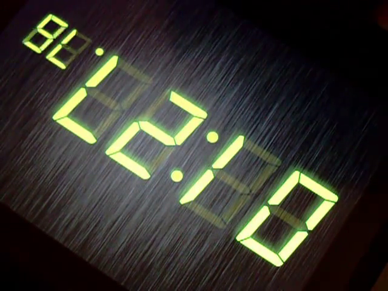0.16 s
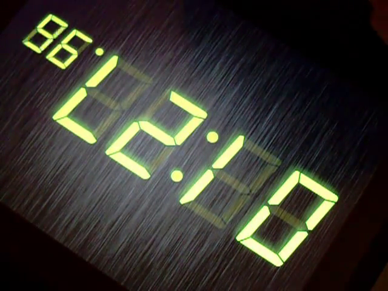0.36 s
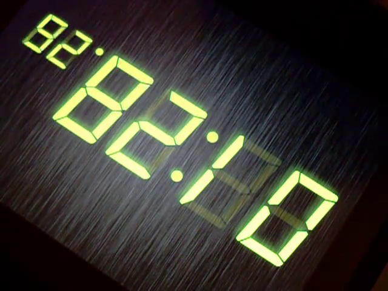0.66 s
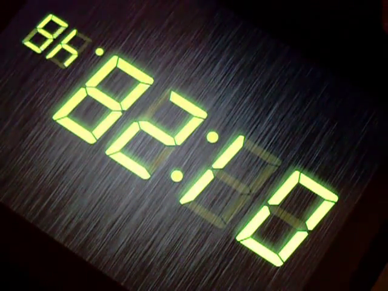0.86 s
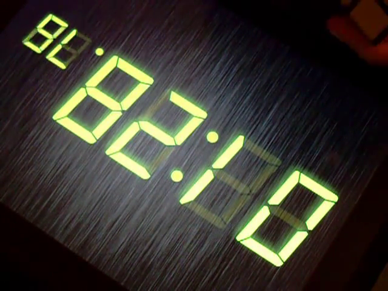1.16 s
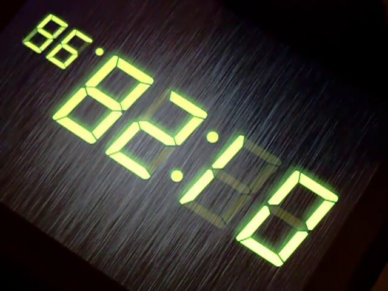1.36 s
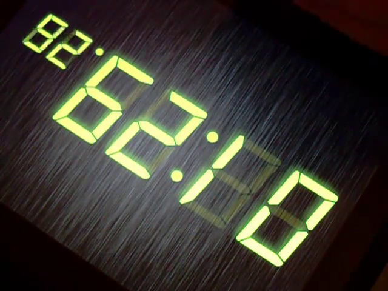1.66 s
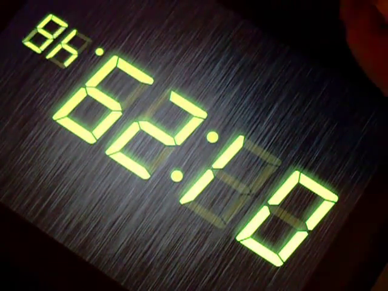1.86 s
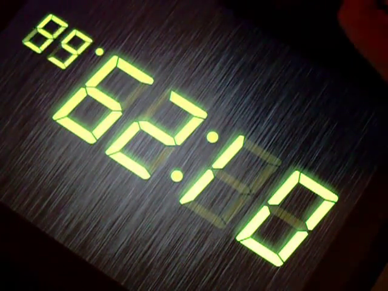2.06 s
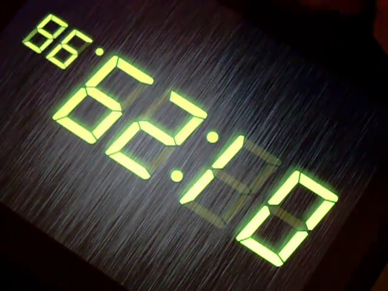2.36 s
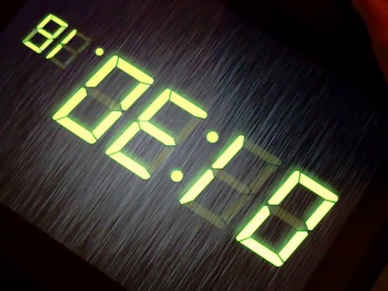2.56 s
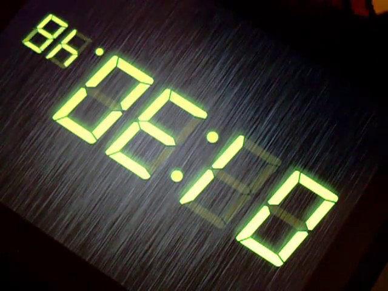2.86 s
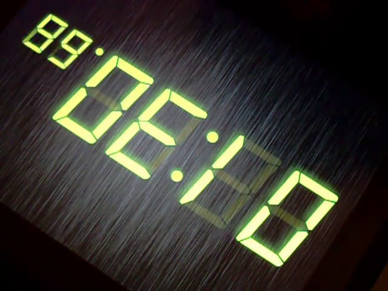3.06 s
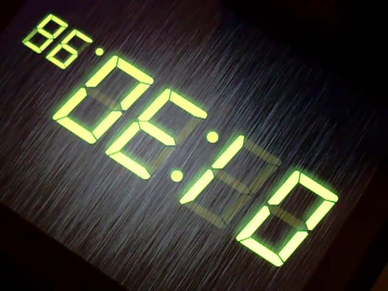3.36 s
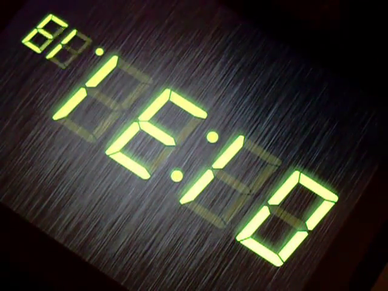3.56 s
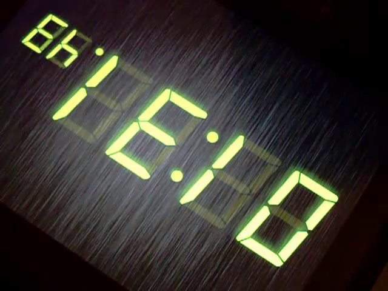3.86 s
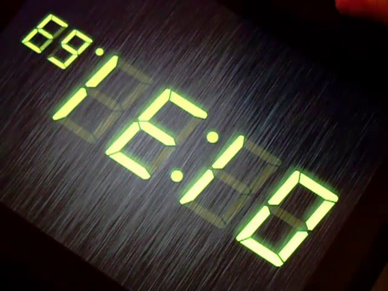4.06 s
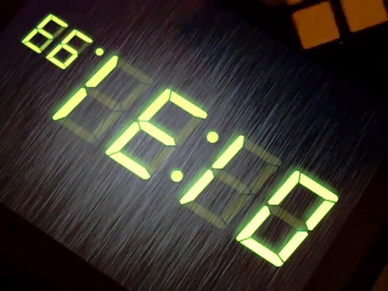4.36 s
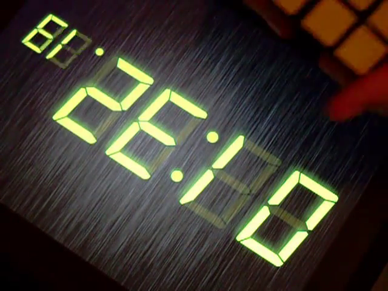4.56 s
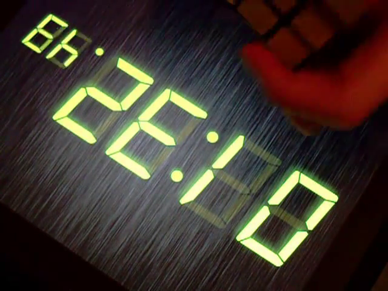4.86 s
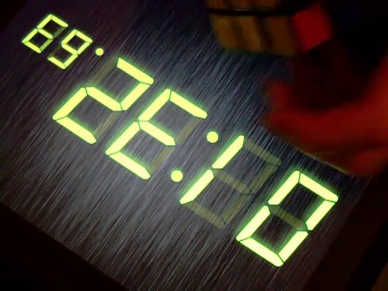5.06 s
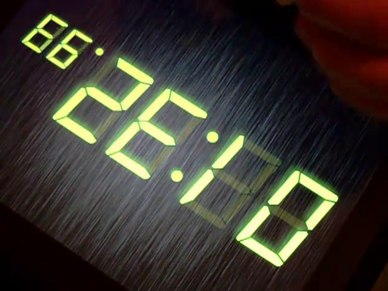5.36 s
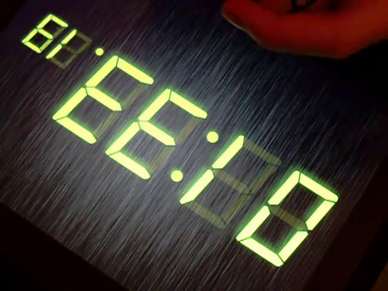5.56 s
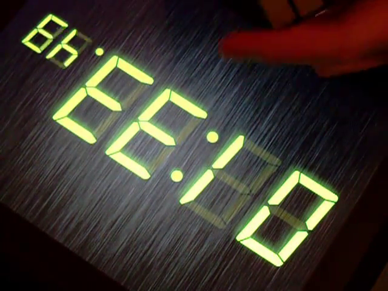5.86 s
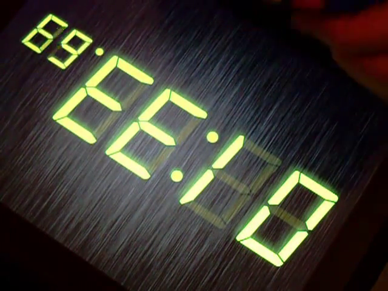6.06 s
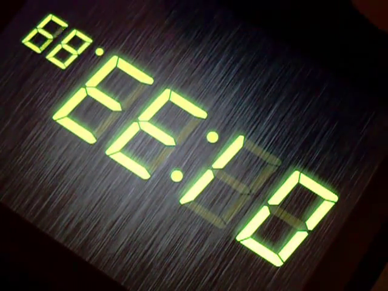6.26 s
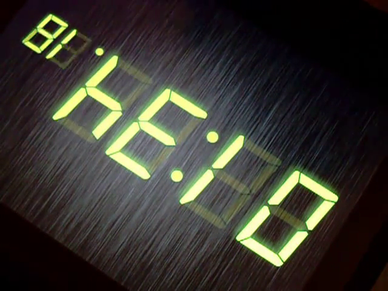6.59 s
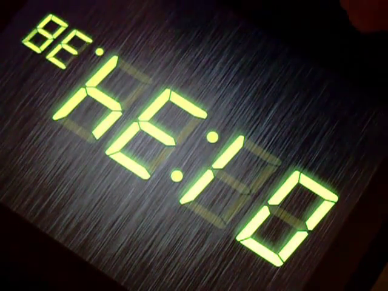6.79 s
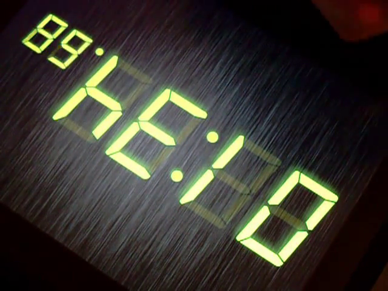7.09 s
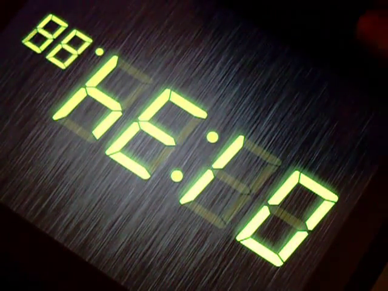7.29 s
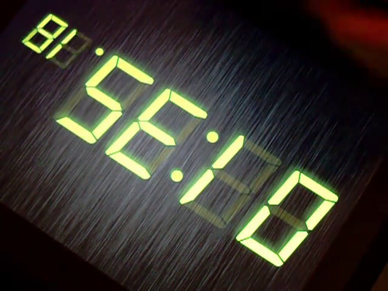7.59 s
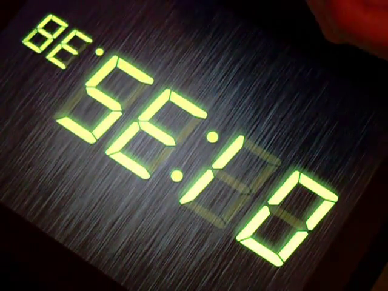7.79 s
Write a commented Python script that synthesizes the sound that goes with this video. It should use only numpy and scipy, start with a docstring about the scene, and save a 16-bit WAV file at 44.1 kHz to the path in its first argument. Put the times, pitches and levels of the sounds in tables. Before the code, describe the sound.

A hollow plastic puzzle cube is twisted by hand, close by in a quiet room with very little reverberation. A few light ticks lead to a loud cluster of dry clacks at about 0.7 seconds, and another follows near 1.4. After a brief lull with faint ticks, lighter turns click and rattle at around 2.2 and 2.8 seconds, followed by scattered single clicks. A strong flurry of snaps comes at about 4 seconds. From roughly 4.9 seconds the turns follow closely, each with a short scrape and a rattle of loose pieces, the sharpest near 6.3, 7 and 7.5 seconds, and the clicking carries on until about 8 seconds. Underneath, a faint rumbling hiss and a thin electrical whine run throughout, swelling and sinking together and growing slightly louder from about 3.5 seconds.

```python
"""A rumbling hiss and a thin electrical whine are heard first, swelling and sinking together.
Over them a hollow plastic puzzle cube is twisted by hand, close by in a quiet room. Pieces snap past
each other, and each impact excites the damped modes of the shell as a short dry click. Turning layers
scrape by friction and loose pieces rattle; hard snaps jolt the hand, and the room reverberates faintly."""
import sys
import numpy as np
from scipy import signal
from scipy.fft import rfft, irfft, next_fast_len
from scipy.io import wavfile

SR = 44100
rng = np.random.default_rng(int(sys.argv[2]) if len(sys.argv) > 2 else 0)


def master_out(mix):
    """Clip the mix to full scale and print it as 16-bit PCM to the path in sys.argv[1]."""
    frames = np.transpose(np.atleast_2d(mix))
    ceiling = np.clip(frames, -1, 1)
    pcm = np.round(ceiling * 32767).astype(np.int16)
    wavfile.write(sys.argv[1], SR, pcm)


N = 349713


def undb(db):
    """Decibel scale: amplitude grows tenfold for every 20 dB."""
    return 10 ** (np.asarray(db) / 20)


def unit_rms(x):
    """Normalisation: the signal is scaled to an rms of 1."""
    return x / np.sqrt(np.mean(x ** 2))


def ring(hz, t60, t):
    """Damped oscillation: a mode struck at time 0 decays by 60 dB in t60 seconds."""
    return np.sin(2 * np.pi * hz * t) * np.exp(-np.log(1000) * t / t60)


# spectrum of the hiss: (frequency [Hz], relative spectral density [dB])
HISS_SPECTRUM = [(12, -38.5), (20, -2.5), (55, -7), (97, -7), (547, -21), (652, -21.5), (974, -25.5),
                 (2400, -30.5), (3160, -32), (3500, -32), (4270, -33), (4970, -33.5), (8000, -37.5),
                 (10400, -69), (17600, -120)]
# partials of the whine: (frequency [Hz], level re the background envelope [dB])
WHINE_PARTIALS = [(959.6, -22), (1920, -24.5), (4799.5, -19), (5760, -32)]
# envelope of the background: (time [s], level [dB])
BACKGROUND_ENVELOPE = [(0.0, -56.5), (0.55, -55.5), (1.99, -61), (2.45, -55), (2.58, -53), (3.56, -48),
                       (6.2, -49.5), (6.58, -52.5), (7.42, -48), (7.93, -51.5)]

def background():
    """Amplitude modulation: one slow envelope carries both a bass-heavy hiss and an electrical whine."""
    size = next_fast_len(N)
    bin_hz = np.arange(size // 2 + 1) * SR / size
    hiss_hz, hiss_db = np.transpose(HISS_SPECTRUM)
    colour = undb(np.interp(np.log(bin_hz + 1), np.log(hiss_hz), hiss_db))
    noise = irfft(rfft(rng.standard_normal(size)) * colour, size)[:N]
    hiss = undb(1.0) * unit_rms(noise)
    t = np.arange(N) / SR
    whine = sum(undb(db) * np.sqrt(2) * np.sin(2 * np.pi * hz * t) for hz, db in WHINE_PARTIALS)
    swell = undb(np.interp(t, *np.transpose(BACKGROUND_ENVELOPE)))
    return swell * (hiss + whine)


def room(source, t60_s=0.12, build_s=0.0088, level_db=-13.5):
    """Reverberation: diffuse reflections build up quickly and decay exponentially."""
    t = np.arange(8192) / SR
    envelope = np.exp(-np.log(1000) * t / t60_s) * np.clip(t / build_s, 0, 1)
    tail = rng.standard_normal(len(t)) * envelope
    tail /= np.sqrt(np.sum(tail ** 2))
    return undb(level_db) * signal.fftconvolve(source, tail)[:N]


def thuds(impacts, hz=178, t60_s=0.013, gain_db=-12):
    """Impulse response: each snap jolts the hand, a dull thud that grows 2 dB per dB of the snap."""
    times, level_db = np.transpose(impacts)[:2]
    jolts = np.zeros(N)
    np.add.at(jolts, (times * SR).astype(int), undb(gain_db + 2 * level_db))
    return signal.fftconvolve(jolts, ring(hz, t60_s, np.arange(4096) / SR))[:N]


# modes of the shell: (frequency [Hz], relative level [dB], T60 before added damping [s])
SHELL_MODES = [(420, -20.5, 0.036), (838, -2.5, 0.054), (1140, -33, .02), (1600, -35, 0.017),
               (1894, -11, 0.099), (2275, -3.5, 0.039), (2760, 1.5, 0.029), (3198, 2.5, 0.02),
               (3788, 4.5, 0.013), (4450, 4, 0.016), (5303, 6.5, 0.013), (6066, 8, 0.014),
               (6750, -3, 0.016), (7400, 1, 0.031)]
# turns of a layer: (start [s], fastest moment [s], other edge [s], scrape level [dB], rattle level [dB]) rows
# whose other edge precedes the start give at most a brief, faint scrape and are heard mainly as scattered
# rattling clicks
LAYER_TURNS = [(0.619, 0.661, 0.85, -57, -35.5), (0.709, 0.757, 0.82, -49, -28.5),
               (1.124, 1.214, 1.39, -54.5, -37.5), (1.31, 1.36, 1.46, -64, -28.5),
               (2.097, 2.225, 2.3, -52.5, -41), (2.723, 2.791, 2.96, -62, -33),
               (3.594, 3.78, 3.82, -51.5, -43), (3.863, 3.923, 4.08, -43, -25.5),
               (4.868, 4.929, 4.99, -38.5, -26.5), (5.201, 5.309, 5.43, -49.5, -30),
               (5.568, 5.637, 5.71, -43.5, -31), (5.88, 5.903, 5.96, -45.5, -44),
               (6.147, 6.283, 6.38, -42, -29.5), (6.695, 6.724, 6.2, -60, -41),
               (6.941, 6.976, 6.93, -50, -31.5), (7.396, 7.52, 7.62, -52, -24.5),
               (7.718, 7.779, 7.92, -56, -38)]
SLOW_DB = -8  # level at the start and the other edge re the fastest moment

def scrape(ticks_per_s=600, fade_s=0.036, t60_share=0.11):
    """Stick-slip friction: faces slide and catch, driving the shell's modes with noise and tiny ticks."""
    t = np.arange(N) / SR
    envelope = np.zeros(N)
    for start, fastest, edge, level_db, _ in LAYER_TURNS:
        fade = np.clip(np.minimum(t - start, edge + 0.016 - t) / fade_s, 0, 1)
        speed_db = np.interp(t, [start, fastest, edge], [SLOW_DB, 0, SLOW_DB])
        envelope += fade * undb(level_db + speed_db)
    catches = rng.random(N) < ticks_per_s / SR
    tick_db = np.minimum(10 * rng.standard_exponential(N), 16)
    ticks = catches * undb(tick_db) * rng.choice([-1, 1], N)
    friction = unit_rms(ticks) + 0.61 * rng.standard_normal(N)
    shell = sum(undb(db) * ring(hz, t60_share * t60, t[:1024]) for hz, db, t60 in SHELL_MODES)
    return envelope * unit_rms(signal.fftconvolve(friction, shell)[:N])


def rattle_impacts(per_turn=9, spread_db=7.5, low_hz=1700, high_hz=3200):
    """Random collisions: rows of small snaps from loose pieces, densest and loudest at top speed."""
    start, fastest, edge, _, rattle_db = np.transpose(LAYER_TURNS)[:, :, None]
    draws = rng.random((len(LAYER_TURNS), per_turn, 5))
    side, distance, strength, pitch, treble = np.moveaxis(draws, 2, 0)
    away = distance ** 1.5  # 0 at the fastest moment, 1 at the start or the other edge
    times = fastest + away * (np.where(side < 0.5, start, edge) - fastest)
    level_db = rattle_db + SLOW_DB * away + spread_db * (2 * strength - 1)
    piece_hz = low_hz + pitch * (high_hz - low_hz)
    treble_db = 10 * treble - 7
    return np.stack([times, level_db, piece_hz, treble_db], axis=2).reshape(-1, 4)


# pieces snapping past each other: (time [s], level [dB], piece frequency [Hz], treble re middle [dB])
SNAP_IMPACTS = [(0.2091, -35, 5750, -2), (0.2701, -28, 6030, 19), (0.3432, -37, 4650, 7),
                (0.46, -32, 3040, -2), (0.6336, -29, 2880, -2), (0.6502, -20, 2240, -2),
                (0.6567, -31, 1980, -18), (0.7163, -27.5, 6400, -6), (0.7216, -17, 2900, 5),
                (0.7249, -10, 1910, -3), (0.7276, -7, 6270, 7), (0.7379, -9, 5250, -9),
                (0.7537, -13, 3640, 8), (0.7663, -8, 2690, 4), (0.808, -34, 1420, -16),
                (0.811, -41, 1920, -8), (0.923, -43.5, 5640, -6), (0.9667, -34.5, 2540, 2),
                (1.0819, -34, 6240, -4), (1.1604, -34, 3230, 4), (1.1762, -35, 1810, 7),
                (1.1804, -30.5, 3060, -2.5), (1.193, -29, 2520, -2), (1.2324, -25.5, 6870, 1),
                (1.3294, -17, 4520, 7), (1.3454, -15.5, 3830, 0), (1.3614, -34, 2520, 4),
                (1.378, -13.5, 3080, 1), (1.3875, -19.5, 4820, 2), (1.4046, -25, 5490, 8),
                (1.4976, -43.5, 4200, 1), (1.6093, -43.5, 6500, 4), (1.639, -42.5, 2450, 12),
                (1.742, -40, 2230, -3.5), (1.8177, -36.5, 4260, 6), (2.0277, -32.5, 3700, 6.5),
                (2.116, -43, 2930, -3), (2.1268, -44.5, 1980, -10), (2.1493, -36, 1920, -4),
                (2.1578, -33.5, 2860, -17), (2.168, -36, 2480, -5), (2.1988, -23, 2910, -2),
                (2.2075, -23, 4650, -4), (2.2112, -23, 5790, -4), (2.224, -17.5, 4820, 8),
                (2.238, -32, 3170, 8), (2.2623, -23, 2690, 3), (2.273, -28, 5250, 4), (2.392, -41, 5840, 3),
                (2.5346, -41, 3140, -11), (2.6415, -27, 3140, 3), (2.6495, -28.5, 1790, -2),
                (2.7456, -30, 2370, -2), (2.7577, -30, 2990, -4), (2.7663, -29, 5940, -5),
                (2.7733, -22.5, 2170, 2), (2.7905, -22, 2130, 4), (2.797, -23, 4930, -4),
                (2.8036, -24, 1660, -6), (2.808, -29, 4070, 9), (2.8582, -39, 2300, -11),
                (2.8928, -30.5, 6120, -13), (3.1787, -24.5, 2200, 0), (3.2412, -27, 2970, 0),
                (3.2656, -27, 2500, 0), (3.4177, -23, 2200, 0), (3.4685, -34, 1550, -9),
                (3.4809, -29.5, 1940, -8), (3.6028, -36, 2240, 9), (3.6666, -30.5, 3080, -7),
                (3.7365, -30, 1490, 7), (3.7519, -25, 5580, 5), (3.792, -26.5, 1960, -3),
                (3.82, -31.5, 2500, 9), (3.8841, -25.5, 1590, -9), (3.896, -31, 2760, -10),
                (3.911, -25, 2950, -9), (3.9216, -8, 3570, -4), (3.939, -26, 6270, -1),
                (3.9449, -11.5, 2540, 9), (3.9572, -20, 3570, 3), (3.992, -11, 2480, 4),
                (4.0081, -10.5, 6010, -4), (4.0324, -19, 6740, -1), (4.0576, -29, 3080, -1),
                (4.097, -27.5, 3210, 14), (4.1082, -28.5, 2370, 7), (4.273, -25.5, 5490, -5),
                (4.3612, -22.5, 2970, -3), (4.5571, -28, 3100, -2), (4.622, -34, 1960, -1),
                (4.7797, -38, 2950, 0), (4.7964, -37, 1810, -13), (4.8002, -33, 1830, -4),
                (4.8093, -42, 2610, -16), (4.8704, -21, 2730, 0), (4.8814, -18.5, 6520, -8),
                (4.9193, -25, 2760, 2), (4.9283, -18, 1720, -12), (4.9404, -29, 6090, -4),
                (4.9467, -26, 2000, -2), (4.973, -24, 3010, -6), (5.1196, -30, 2260, -6.5),
                (5.2236, -31.5, 2170, -7), (5.244, -30, 1790, -6), (5.2596, -32, 2000, 1),
                (5.2817, -25.5, 2370, -9), (5.3199, -18, 6140, 5), (5.3509, -22, 2220, -9),
                (5.4192, -47, 1870, 8), (5.4747, -38, 2090, -9), (5.5937, -28, 5710, -12),
                (5.5971, -28, 6140, 2), (5.6151, -29, 1990, -5), (5.6267, -26, 3530, -6),
                (5.634, -30, 3080, 0), (5.6466, -20, 2710, -1), (5.6942, -34, 2840, -6),
                (5.7332, -31.5, 2930, -0.5), (5.904, -25.5, 1940, -3), (6.0102, -32, 2650, -17),
                (6.0589, -25, 5340, -1.5), (6.1545, -31.5, 2950, 8), (6.1692, -27, 1720, -3),
                (6.183, -35, 4180, 3), (6.2071, -29, 2890, -3), (6.2499, -17, 2820, 1),
                (6.2629, -12, 6030, -1), (6.2658, -10.5, 2410, -7), (6.2739, -13.5, 1810, 1),
                (6.2867, -18, 5730, -4), (6.29, -17, 1530, 5), (6.3177, -27, 5680, -6),
                (6.3262, -20.5, 3420, -7), (6.362, -35.5, 4870, 9), (6.4084, -39, 2630, -2),
                (6.4487, -23, 6680, 5), (6.7098, -27, 2910, 2), (6.7177, -28, 5710, 7),
                (6.7572, -31, 3270, 6), (6.9076, -33, 2890, 10), (6.9591, -21.5, 5230, -2),
                (6.9664, -17.5, 3940, 1), (6.9776, -27, 6590, 12), (6.984, -24, 2670, 8),
                (7.0038, -22, 6050, 3), (7.0116, -19, 6010, -1), (7.0791, -28.5, 1890, -6),
                (7.1337, -32.5, 1870, -13), (7.2201, -22.5, 2840, 9), (7.303, -27, 2240, -1),
                (7.351, -29, 2480, -17), (7.4178, -19.5, 2330, -7), (7.4273, -24, 1920, -9),
                (7.4606, -24, 2970, 12), (7.4903, -24, 1960, -9), (7.5132, -28, 2130, -11),
                (7.526, -14.5, 2260, 13), (7.532, -14.5, 5960, 5), (7.5672, -22, 2280, -9),
                (7.5736, -27, 2390, -12), (7.6122, -43, 2110, -13), (7.6801, -27, 2130, -6),
                (7.731, -26.5, 1870, -2), (7.744, -29, 2670, -2), (7.7496, -29.5, 2150, 0),
                (7.757, -35, 6120, 1), (7.773, -36, 2020, -8), (7.778, -31, 1490, -8),
                (7.8166, -18, 2800, 6), (7.827, -34, 2910, -3), (7.8681, -17.5, 2820, -9),
                (7.887, -27, 5640, 11)]

def snaps(impacts, treble_hz=3800, grip_t60_share=0.5):
    """Modal excitation: a chatter of contacts rings the struck piece and the finger-damped shell."""
    times, level_db, piece_hz, treble_db = impacts.T[:, :, None]
    hz, db, t60 = np.transpose(SHELL_MODES)
    modes = len(hz)
    t = np.arange(1024) / SR
    draws = rng.standard_normal((len(times), 2 * modes + 256))
    share, detune, chatter = np.split(draws, [modes, 2 * modes], axis=1)
    # the place of the blow changes each mode's share, the grip shifts its frequency
    gain = undb(db + treble_db * (hz > treble_hz) + 3 * share)
    shifted_hz = hz * (1 + 0.062 * detune)
    shell = sum(gain[:, [k]] * ring(shifted_hz[:, [k]], grip_t60_share * t60[k], t) for k in range(modes))
    piece = undb(8 + np.maximum(treble_db, 0)) * ring(piece_hz, t60=0.007, t=t)
    # spiky contact forces build up fast and die within a few milliseconds
    force = chatter ** 3 * t[:256] ** 0.63 * np.exp(-t[:256] / 0.0006)
    clicks = signal.fftconvolve(shell + piece, force, axes=1)
    clicks *= undb(level_db + 3.23) / np.abs(clicks).max(axis=1, keepdims=True)
    onsets = ((times - 0.0004) * SR).astype(int)
    track = np.zeros(N + clicks.shape[1])
    np.add.at(track, onsets + np.arange(clicks.shape[1]), clicks)
    return track[:N]


def scene():
    """Superposition: the cube's direct sound, its reverberation and the background add in one channel."""
    impacts = np.vstack([SNAP_IMPACTS, rattle_impacts()])
    vibration = snaps(impacts) + scrape()
    # a small light shell radiates low frequencies poorly
    radiation = signal.butter(2, 1320, "high", fs=SR, output="sos")
    cube = signal.sosfilt(radiation, vibration) + thuds(SNAP_IMPACTS)
    return (cube + room(cube) + background())[None]


def record(dry, cutoff_hz=7300, noise_db=-101):
    """Band limiting: a low sampling limit removes the top treble, and the converter adds a faint hiss."""
    low_pass = signal.butter(30, cutoff_hz, fs=SR, output="sos")
    return signal.sosfilt(low_pass, dry) + undb(noise_db) * rng.standard_normal(dry.shape)


dry = scene()
out = record(dry)
master_out(out)
```